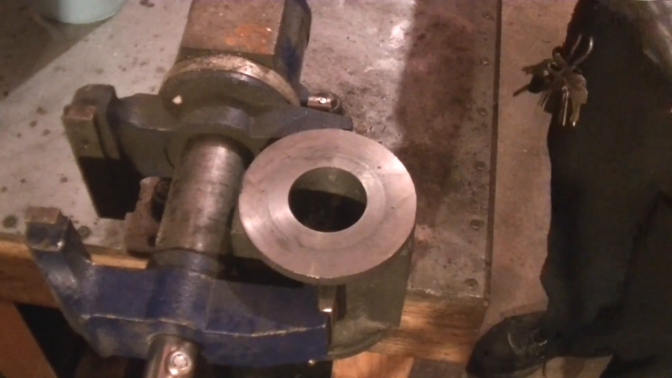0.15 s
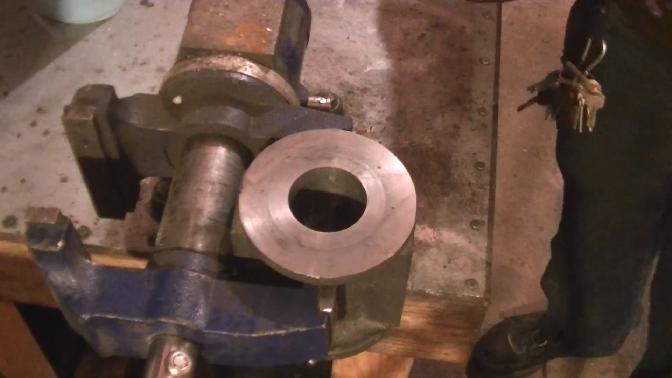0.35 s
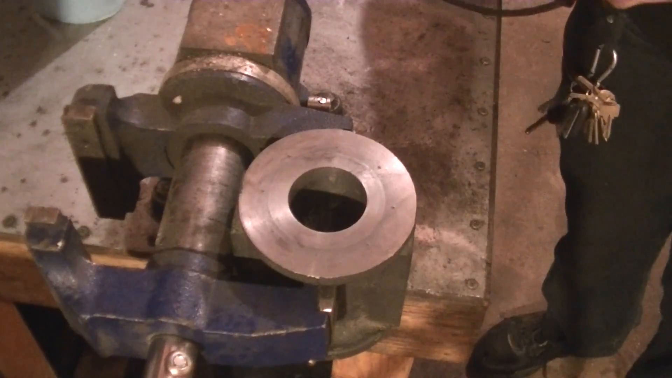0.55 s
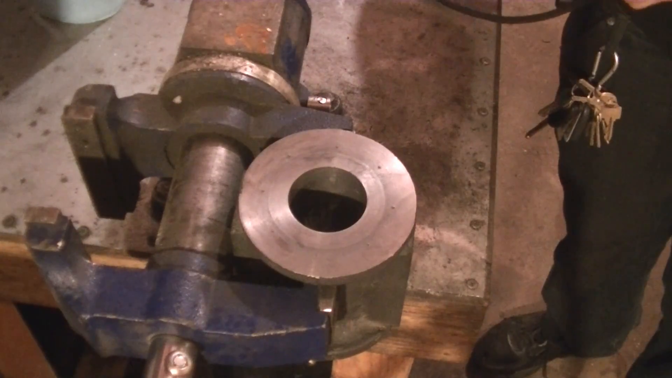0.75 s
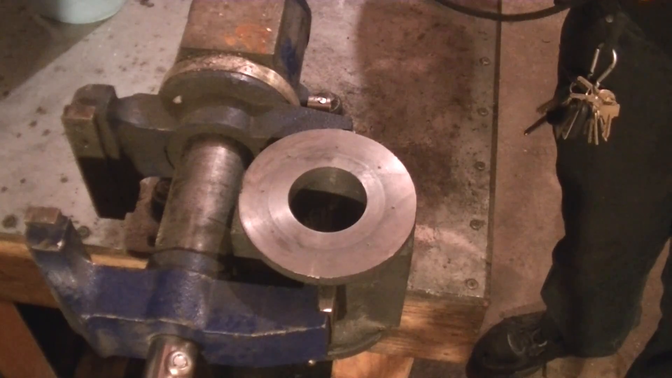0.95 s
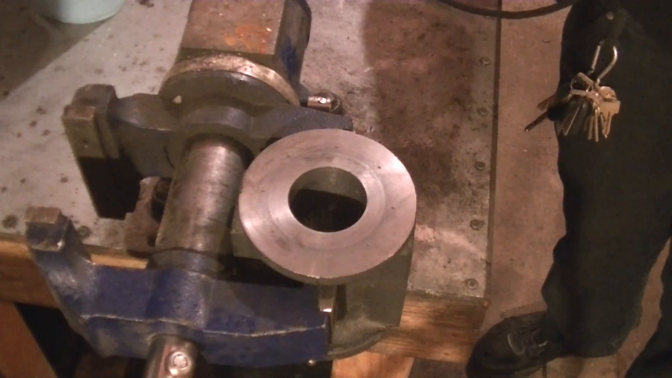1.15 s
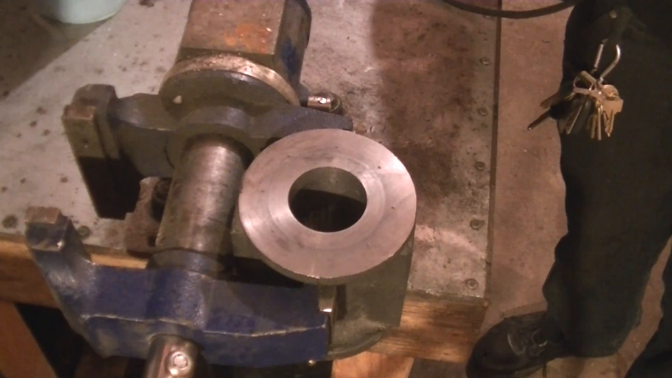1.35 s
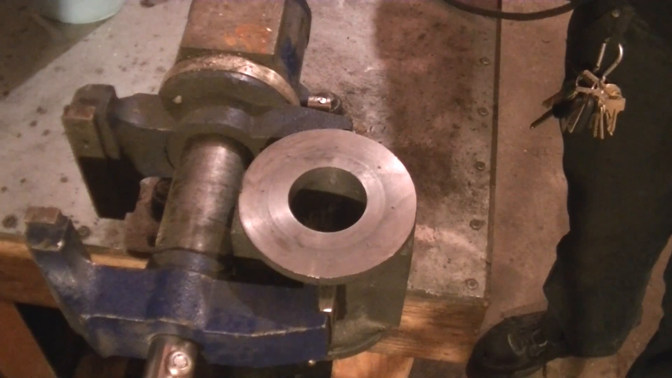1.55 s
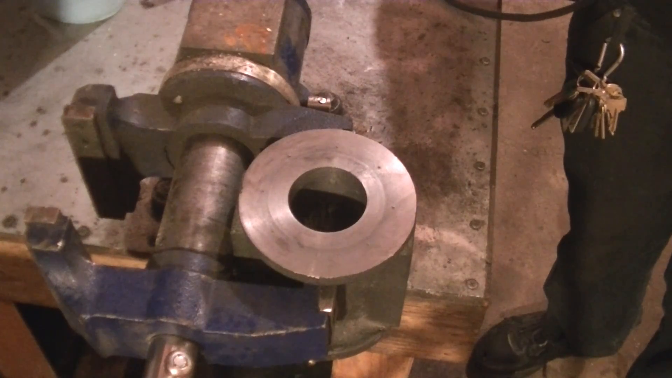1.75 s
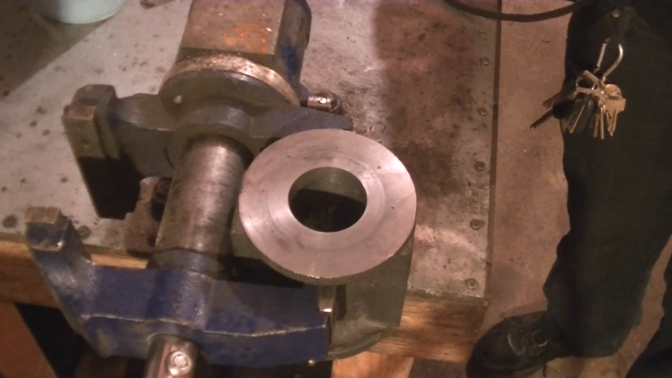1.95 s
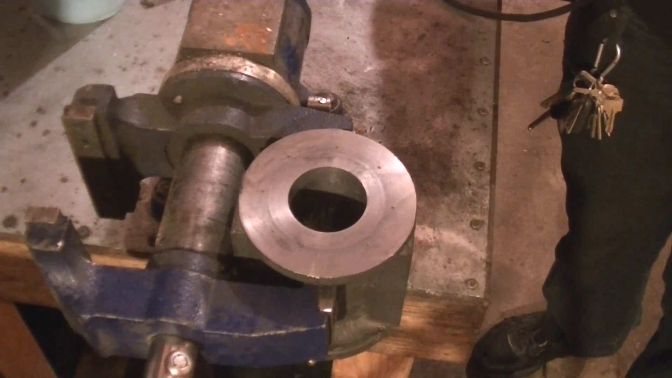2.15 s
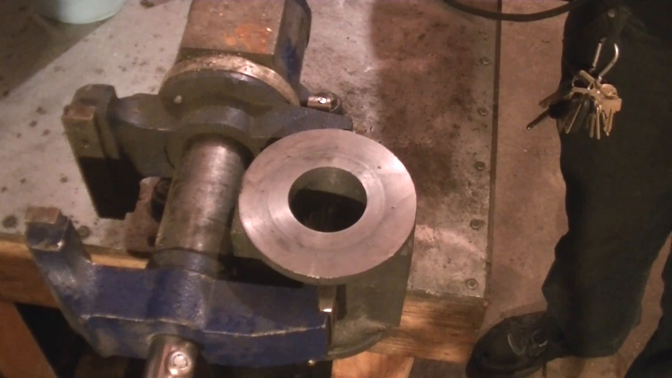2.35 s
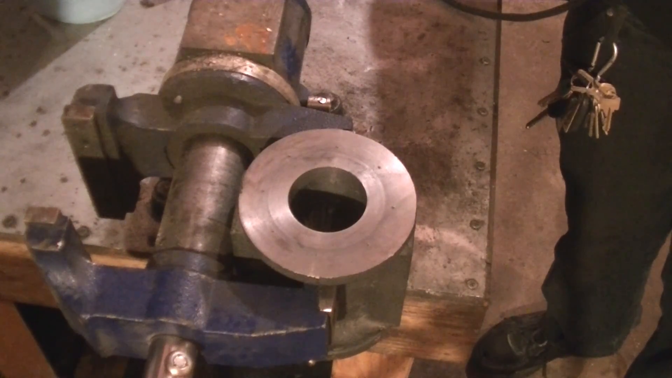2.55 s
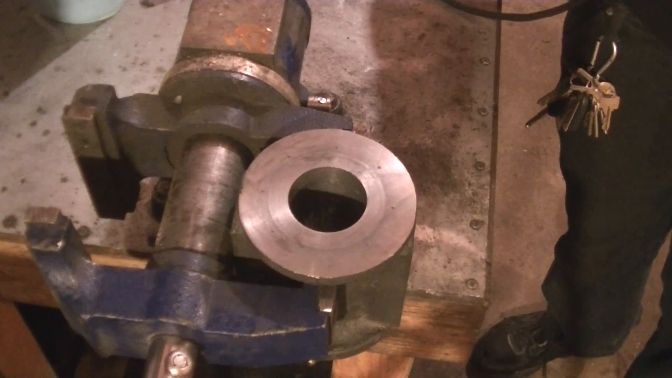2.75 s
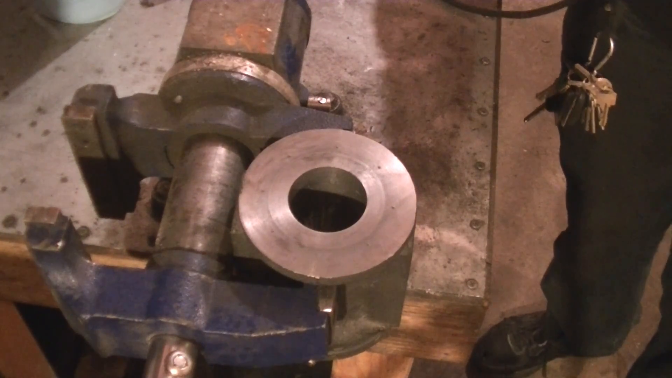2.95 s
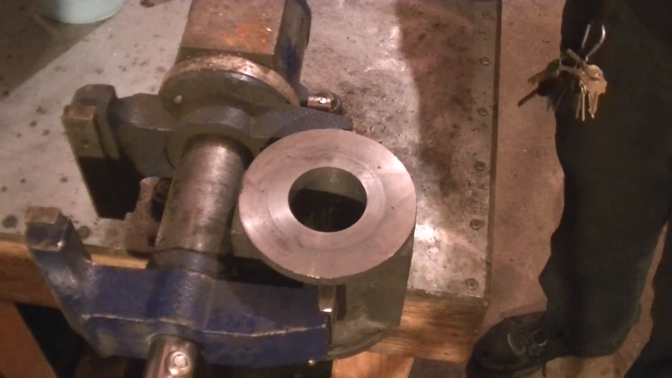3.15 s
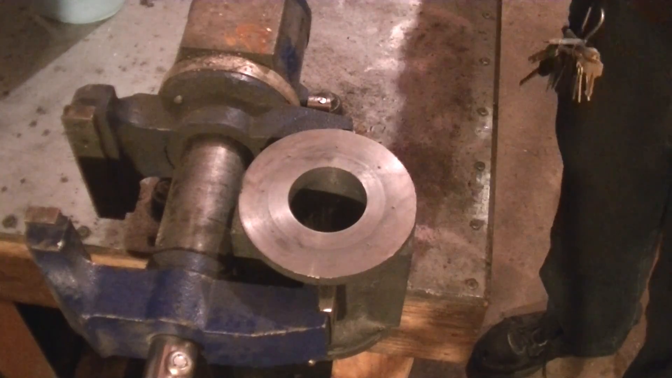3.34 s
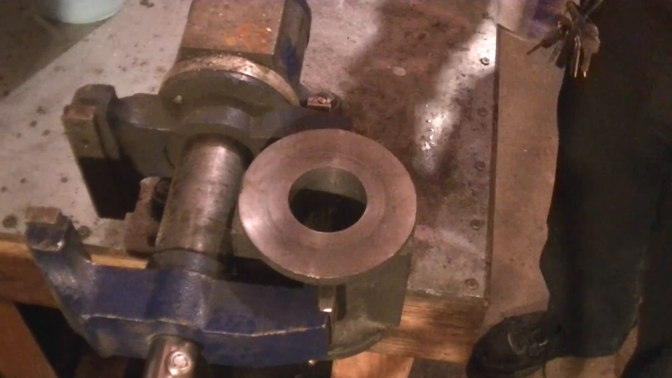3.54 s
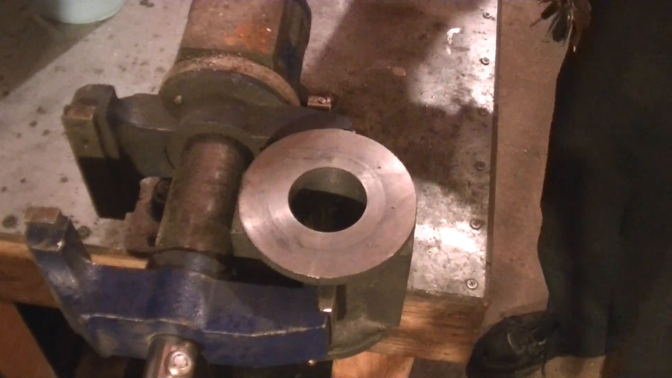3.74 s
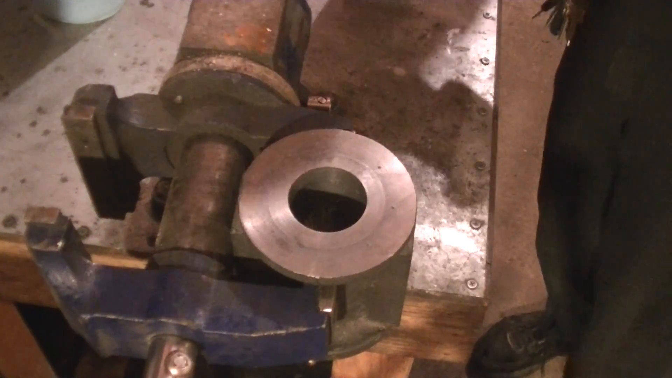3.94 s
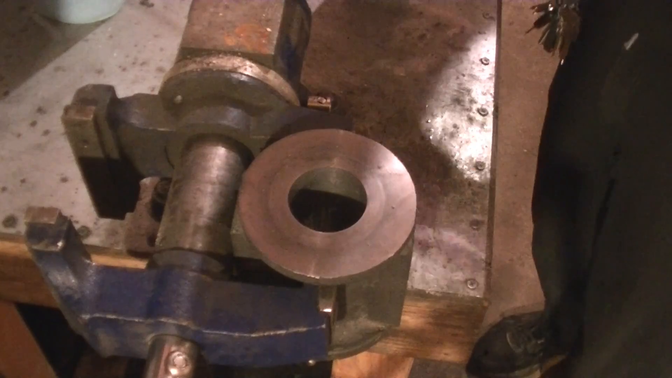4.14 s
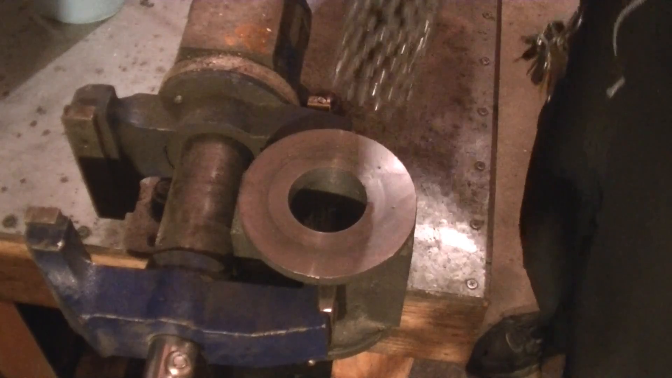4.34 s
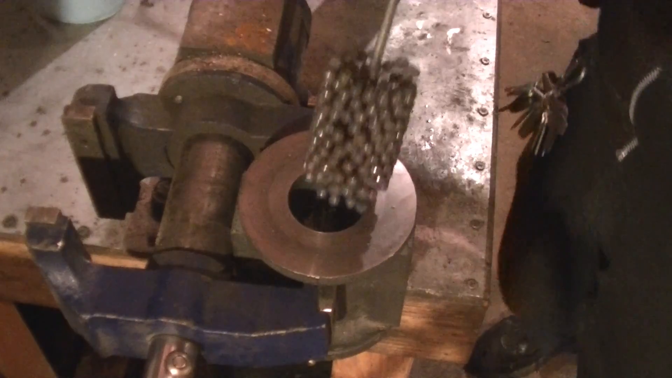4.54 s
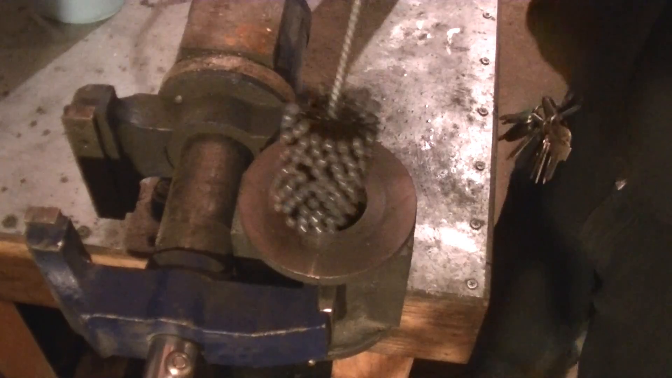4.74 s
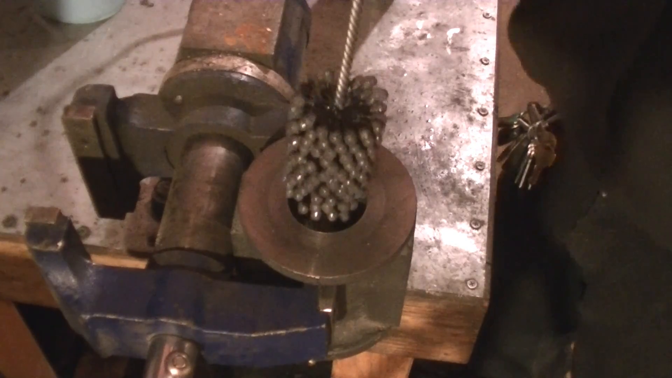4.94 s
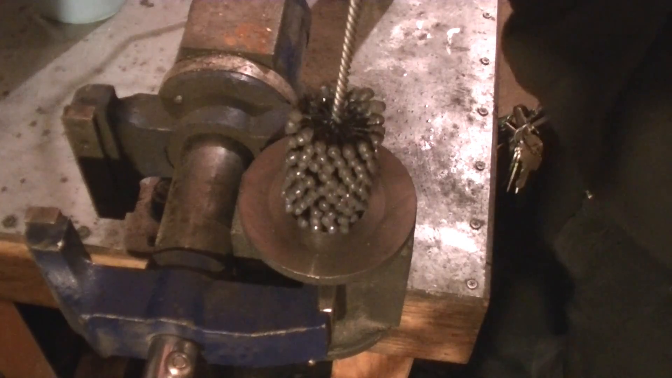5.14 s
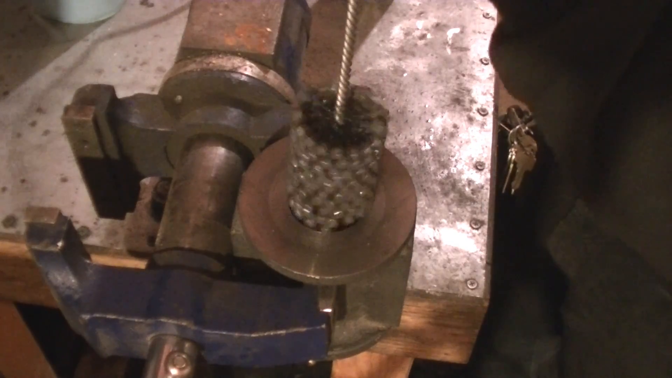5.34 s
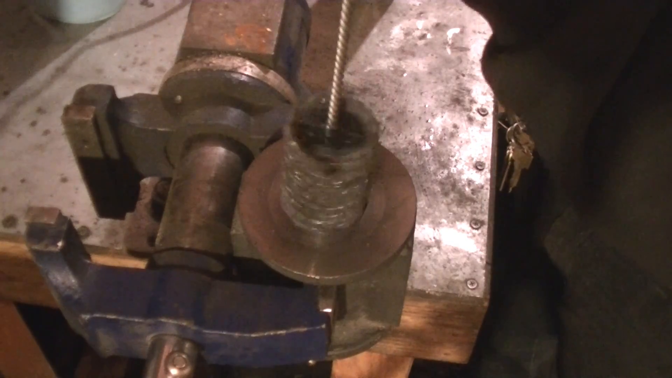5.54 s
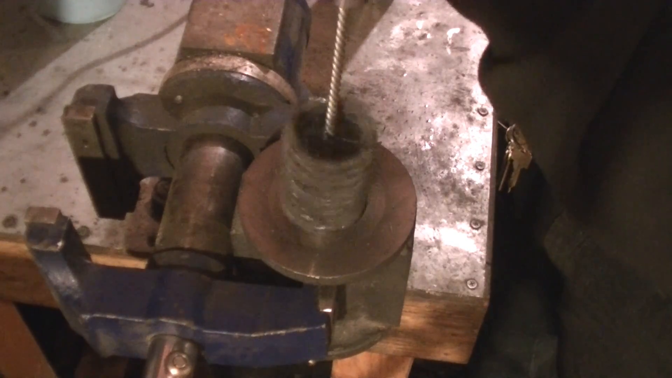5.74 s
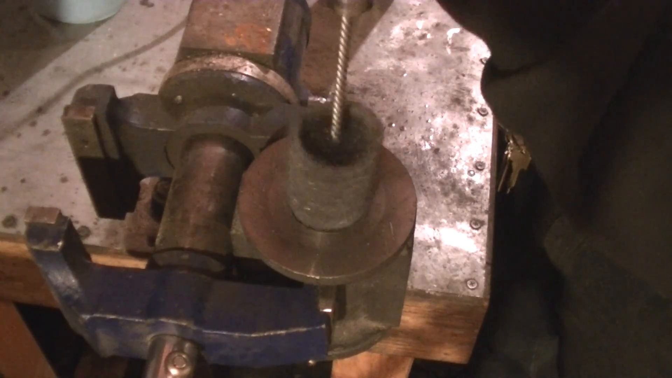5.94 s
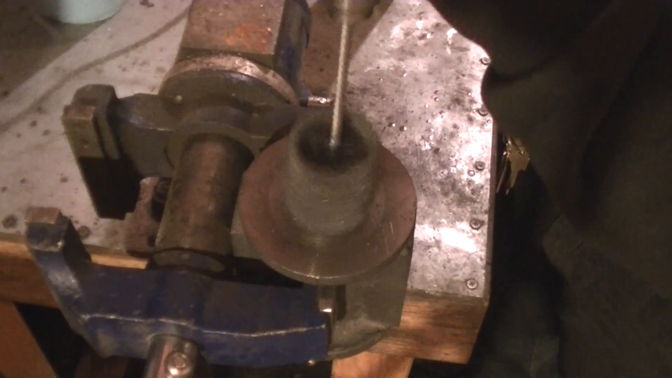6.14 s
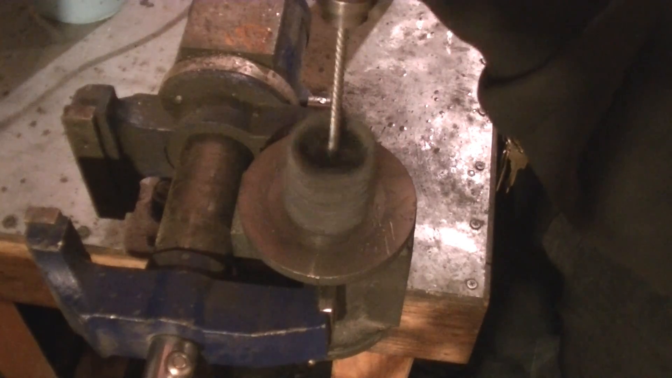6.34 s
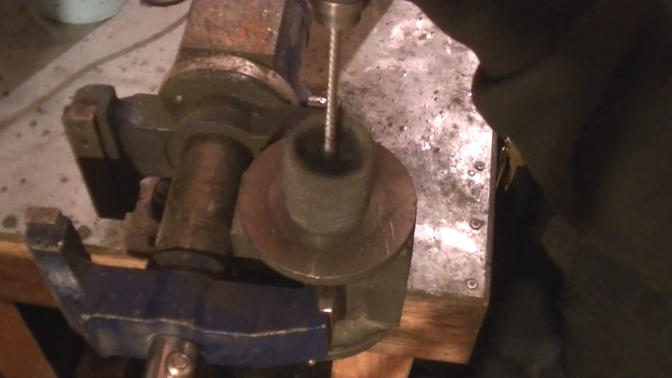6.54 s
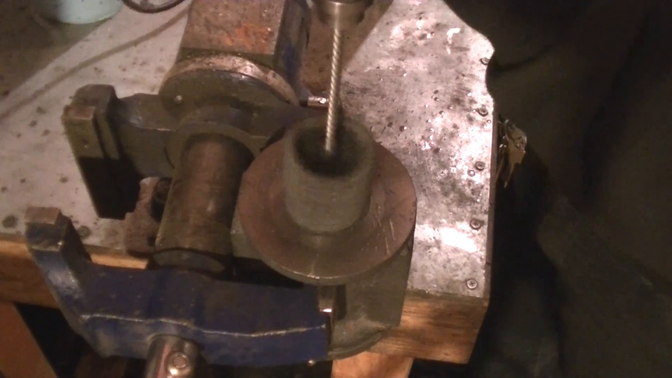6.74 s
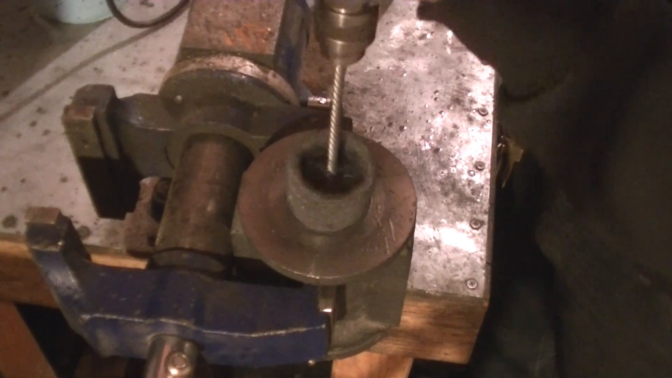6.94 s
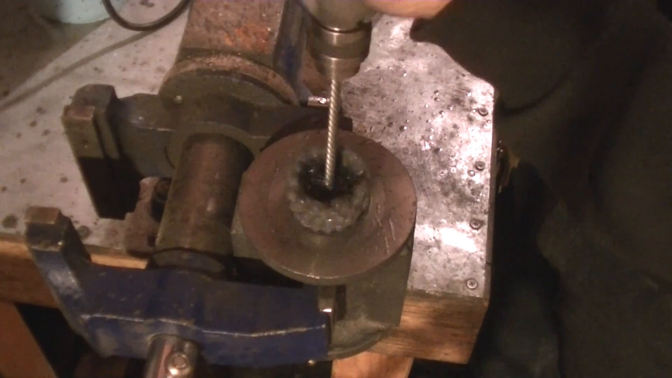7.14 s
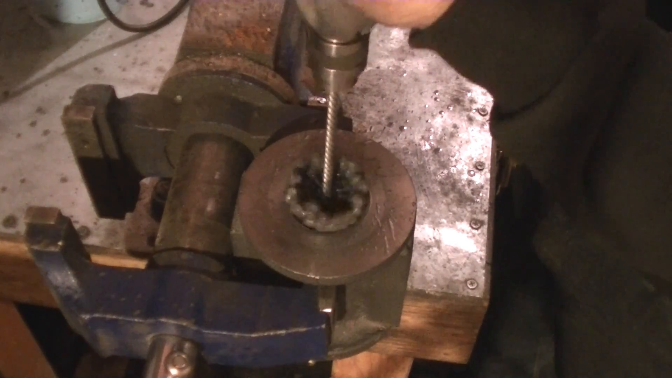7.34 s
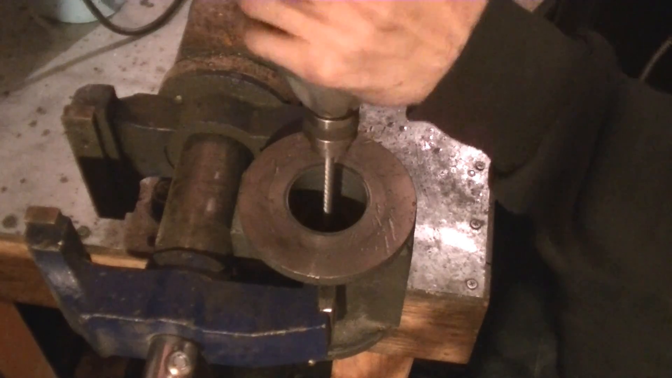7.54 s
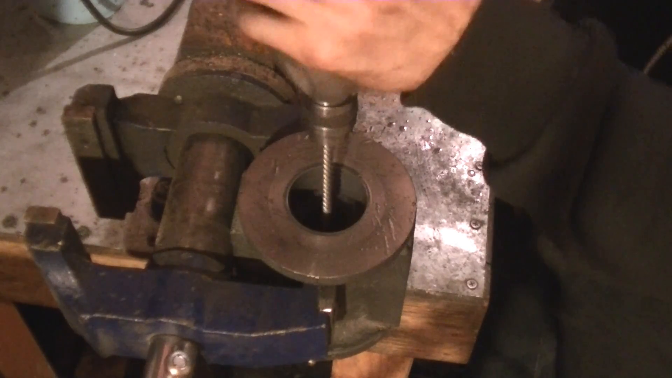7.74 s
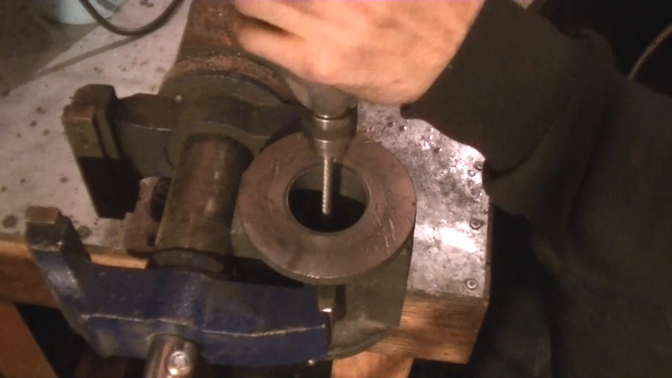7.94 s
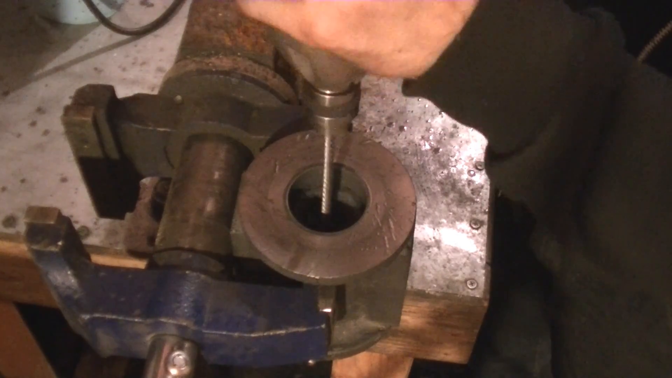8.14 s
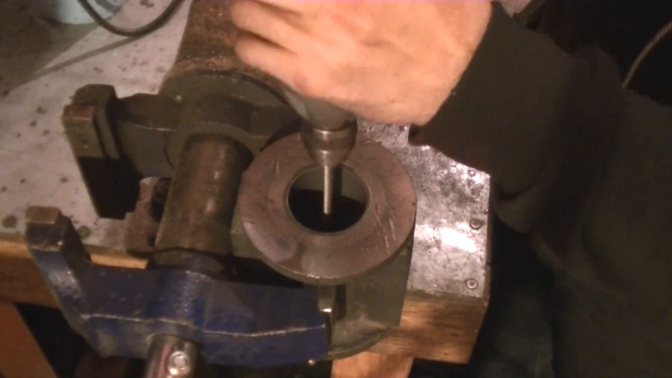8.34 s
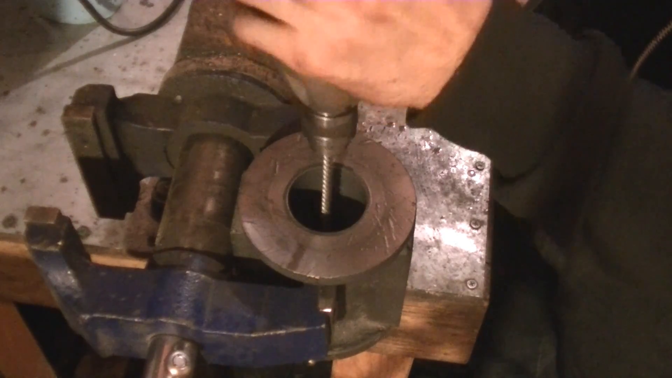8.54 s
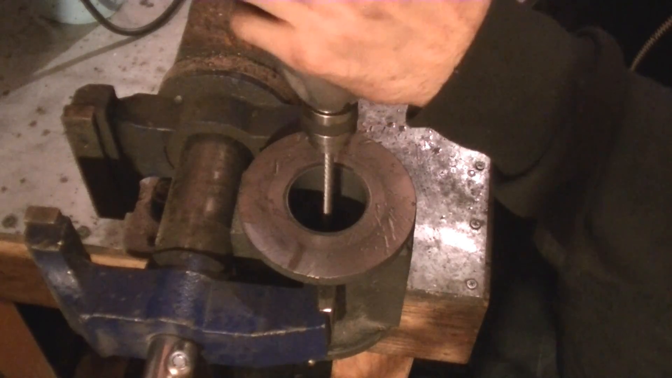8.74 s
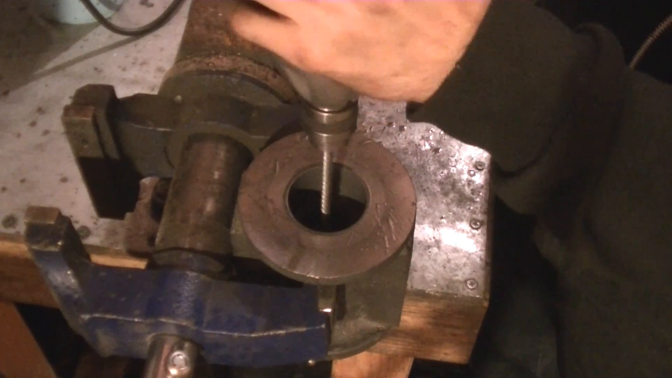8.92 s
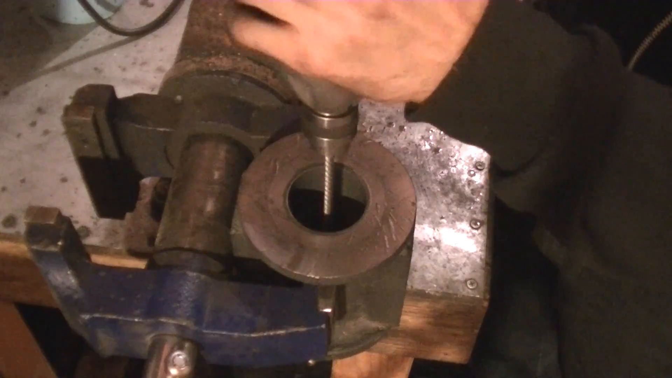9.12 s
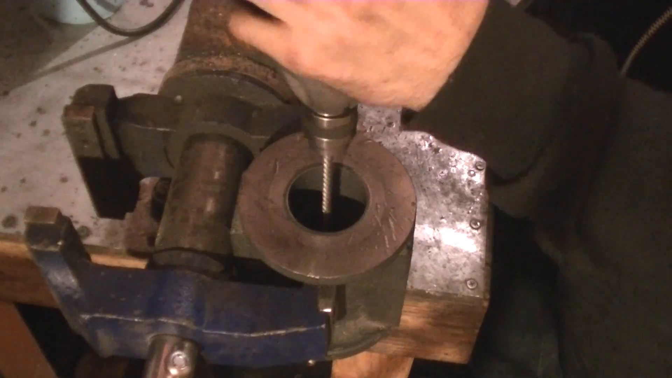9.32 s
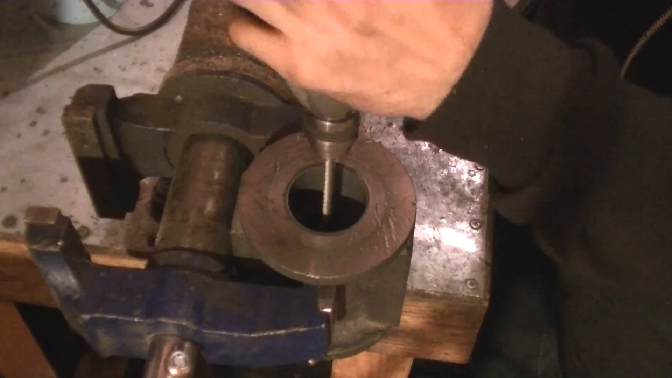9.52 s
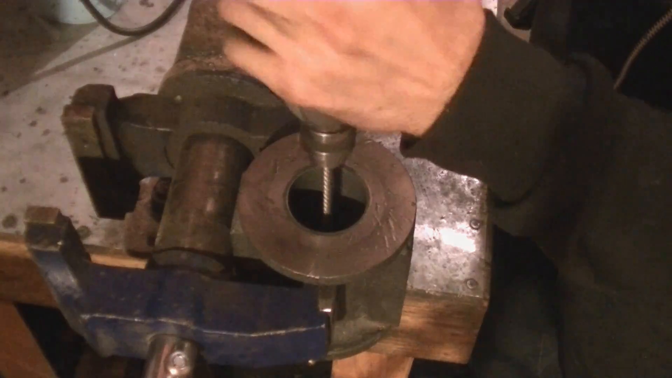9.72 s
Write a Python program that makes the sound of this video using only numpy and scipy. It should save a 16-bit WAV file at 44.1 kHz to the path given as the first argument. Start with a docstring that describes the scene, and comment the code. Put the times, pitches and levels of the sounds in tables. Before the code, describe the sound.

Buzzing drill ticks and spray hiss, a pause of cloth and metal clinks, then a rising whine, a sag, and steady gritty honing.

```python
"""Clothes rustle in a quiet shop, then oil spits and jets onto the ball hone of a corded drill.
The drill creeps on a barely pressed trigger: each mains cycle kicks its body, and loose gears rattle.
The can lands and rings the bench; metal clinks, cloth rustles and the hone is set on a steel cylinder held in a vise.
The drill winds up, sags as the beads are pushed into the bore, and whines on while they scrub the wall.
Whines are sines at multiples of rotor speed; scrubbing is coloured noise, in jerks at first, then even."""
import sys
import numpy as np
from scipy import signal
from scipy.fft import rfft, irfft
from scipy.io import wavfile
from scipy.ndimage import uniform_filter1d

SR = 44100
rng = np.random.default_rng(int(sys.argv[2]) if len(sys.argv) > 2 else 0)


def pcm_store(signal):
    """Save signal as 16-bit PCM."""
    levels = np.round(np.clip(np.atleast_2d(signal), -1, 1) * 32767)
    wavfile.write(sys.argv[1], SR, levels.astype(np.int16).T)


N = 431298
TIME = np.arange(N) / SR   # s
MAINS_HZ = 60
PINION_TEETH, WHEEL_TEETH, SEGMENTS = 7, 38, 12   # gear teeth, gear teeth, commutator segments


def from_db(db):
    """Decibels to gain."""
    return 10 ** (np.asarray(db) / 20)


def rms_one(x):
    """Scale to unit rms."""
    return x / np.sqrt(np.mean(x ** 2) + 1e-20)


def in_time(rows):
    """Each column of a curve, drawn in straight lines over the samples."""
    seconds, *columns = np.transpose(rows)
    return [np.interp(TIME, seconds, column) for column in columns]


def since(start, attack=.01):
    """Rises from nought to one and stays."""
    return np.clip((TIME - start) / max(attack, 1 / SR), 0, 1)


def swell(start, attack, hold, release):
    """Attack, hold and release between nought and one."""
    return since(start, attack) * (1 - since(start + attack + hold, release))


def swells(rows):
    """Gain of a run of soft-edged swells, each with its own level."""
    return sum(from_db(db) * swell(*shape) ** 2 for *shape, db in rows)


def drift(rate):
    """Slow random wander of unit rms."""
    knots = rng.standard_normal(4000)
    return rms_one(np.interp(TIME * rate * 2, np.arange(len(knots)), knots))


def colour(points, hz):
    """Gain of a spectrum at the given frequencies."""
    points = np.array(points)
    return from_db(np.interp(np.log(hz), np.log(points[:, 0]), points[:, 1]))


def response(points):
    """Causal impulse response of a body with this spectrum; it rings longest at steep edges."""
    hz = np.maximum(np.fft.rfftfreq(4096, 1 / SR), 1)
    cepstrum = irfft(np.log(colour(points, hz)))
    half = len(cepstrum) // 2
    # folding the cepstrum forward in time gives minimum phase
    folded = np.r_[cepstrum[0], 2 * cepstrum[1:half], np.zeros(half)]
    pulse = irfft(np.exp(rfft(folded)))[:half]
    return pulse / np.sqrt(np.sum(pulse ** 2))


def through(x, points):
    """Pass a force through a body, keeping the power of white noise."""
    return signal.oaconvolve(x, response(points))[:N]


def noise(points, grain_db=0):
    """Coloured noise made of contacts whose sizes spread by grain_db."""
    sizes = from_db(grain_db * rng.standard_normal(N))
    return rms_one(through(rng.standard_normal(N) * sizes, points))


def resonance(x, hz, width):
    """Two-pole band-pass with roughly unit gain on top."""
    r = np.exp(-np.pi * width / SR)
    feed = np.array([1, 0, -1]) * (1 - r * r) / 2
    back = [1, -2 * r * np.cos(2 * np.pi * hz / SR), r * r]
    return signal.lfilter(feed, back, x + 1e-18)


def ringing_noise(hz, width, second_hz, second_width):
    """White noise through two resonances in a row, at unit rms."""
    return rms_one(resonance(resonance(rng.standard_normal(N), hz, width), second_hz, second_width))


def ringing_modes(modes):
    """Sum of noise-driven resonances; rows of Hz, width in Hz, level in dB."""
    return sum(from_db(db) * ringing_noise(hz, width, hz, 2 * width) for hz, width, db in modes)


def fade(clicks, t60):
    """Every click starts an exponential decay, falling 60 dB in t60 seconds."""
    return signal.lfilter([1], [1, -from_db(-60 / (t60 * SR))], clicks + 1e-18)


def strikes(rows):
    """A click for each row of seconds and dB."""
    out = np.zeros(N)
    for s, db in rows:
        out[int(s * SR)] += from_db(db)
    return out


# Colour of the quiet shop. Each row: frequency in Hz, relative density in dB.
ROOM_COLOUR = [(15, -52), (25, -28), (48, -7.5), (70, -3), (92, -14.5), (134, -3), (157, -16.5),
               (185, -6.5), (344, -9.5), (5730, -23.5), (16000, -34)]
# Low hum of the shop. Each row: time in seconds, level in dB.
HUM_LEVEL = [(0, -72), (2.9, -58.5), (3.05, -70.5), (9.78, -64.5)]


def room_tone(floor_db=-56, hum_hz=71):
    """Steady coloured noise and one low sine whose level wanders."""
    hum = np.sqrt(2) * from_db(in_time(HUM_LEVEL)[0]) * np.sin(2 * np.pi * hum_hz * TIME)
    return hum + from_db(floor_db) * noise(ROOM_COLOUR)


# Cloth on cloth. Each row: start, attack, hold and release in seconds, level in dB.
CLOTH_RUSTLES = [(-.02, 0.016, .03, 0.32, -33), (.16, 0.071, .01, .05, -44), (3.56, 0.17, 0.18, .17, -35),
                 (4.01, 0.047, .18, .25, -47.5), (4.44, 0.079, .03, .05, -51),
                 (4.56, 0.066, 0.044, 0.14, -35.5), (4.75, 0.072, 0.13, 0.19, -33.5)]
# Tone of the cloth. Each row: frequency in Hz, relative density in dB.
CLOTH_COLOUR = [(150, -17), (320, -1), (480, -5), (700, -5), (1200, -3), (2000, -7.5), (3000, -13),
                (8500, -25.5), (16000, -38)]
# The drill shifts dully in the hands. Each row: start, attack, hold and release in seconds, level in dB.
GRIP_THUDS = [(-.02, .02, 0.13, .13, -45), (3.6, 0.063, .2, .1, -54), (3.95, 0.082, 0.35, 0.25, -47.5),
              (4.57, 0.055, 0.063, 0.12, -48), (4.79, 0.052, 0.14, 0.22, -38)]
# Tone of the thuds. Each row: frequency in Hz, relative density in dB.
GRIP_COLOUR = [(25, -37), (70, -9), (115, 5.5), (170, -9), (240, 6), (340, -0.5), (600, -8), (1500, -37.5)]


def handling(crumple_db=2.2):
    """Cloth slides in grainy, flickering noise, and the drill shifts in the hands as low dull noise."""
    crumple = from_db(crumple_db * drift(45))
    cloth = swells(CLOTH_RUSTLES) * crumple * noise(CLOTH_COLOUR, grain_db=7)
    return cloth + swells(GRIP_THUDS) * noise(GRIP_COLOUR)


# Soft bumps against the bench. Each row: time in seconds, relative level in dB.
BENCH_BUMPS = [(4.068, -32.5), (4.143, -43), (4.208, -32), (4.228, -44), (4.43, -46), (4.61, -36),
               (4.645, -37), (4.852, -28), (4.898, -29), (4.94, -28)]


def bumps(bump_t60=0.098):
    """Dull knocks as the drill and body shift against the bench: softened decays of low noise."""
    push = uniform_filter1d(fade(strikes(BENCH_BUMPS), bump_t60), size=300)
    return push * noise([(30, -19), (70, -10), (120, -3), (170, -9), (240, 7.0),
                         (350, -5), (600, -6), (1500, -30), (5000, -32)])


# The can lands on the bench. Each row: time in seconds, relative level in dB.
CAN_LANDINGS = [(3.8935, -4), (3.904, -17), (3.9285, -16)]
# Modes of can and bench. Each row: frequency in Hz, relative level in dB, 60 dB decay in seconds before a cap.
BENCH_MODES = [(118, -22, 1.2), (309, 2.5, 0.17), (515, -1.5, 0.2), (818, -23, 0.3), (1010, -28, 0.53),
               (1210, -22, 0.22), (1630, -13, 0.17), (1693, -2, 0.24), (1640, -16, 0.33), (2170, -32, 0.98),
               (2353, -23, 0.29), (2492, -16, 0.31), (2891, -24, 0.55), (3150, -11, 0.11),
               (3230, -22, 0.52), (3752, -28, 0.39)]
# Two faint clacks of the drill at 2.95 s, then small clinks of can, keys and beads. Each row: time in seconds,
# relative level in dB.
METAL_CLINKS = [(2.9545, -26), (2.9715, -34.5), (3.475, -32.5), (3.7354, -43), (3.8936, -11.5),
                (3.929, -19), (3.9515, -9.5), (3.991, -26), (4.133, -26.5), (4.2528, -27), (4.574, -32),
                (4.5965, -24.5), (4.7706, -28), (4.786, -34), (4.8324, -13.5), (4.9, -29), (4.9342, -18.5),
                (5.1273, -29), (5.2885, -12)]
# Tone of the clinks. Each row: frequency in Hz, relative density in dB.
METAL_COLOUR = [(200, -9), (900, 5), (2000, 2), (2700, -3.5), (3300, -2), (4200, -1.5), (6000, -4),
                (11000, -9.5), (16000, -23)]


def knocks(ring_db=-14, clatter_db=-9, clatter_t60=0.13, boom_db=-31.5, boom_t60=0.75,
           clink_db=-7, clink_t60=0.029, tail_db=-22, tail_t60=0.26):
    """The can rings the bench and shakes what lies on it; small metal things clink."""
    blows, clinks = strikes(CAN_LANDINGS), strikes(METAL_CLINKS)
    t = TIME[:SR // 2]
    bench = 0
    for hz, db, t60 in BENCH_MODES:
        decay = from_db(db - 60 * t / min(t60, .35))   # no mode rings longer than 0.35 s
        bench = bench + decay * np.sin(2 * np.pi * hz * t) * rng.choice([-1, 1])
    ring = from_db(ring_db) * signal.oaconvolve(blows, bench)[:N]
    clatter = from_db(clatter_db) * fade(blows, clatter_t60) * noise(
        [(30, -34), (110, 0), (280, 3.5), (700, -0.5), (1500, 4.5), (3000, -6.0), (8000, -27), (16000, -58)])
    boom = from_db(boom_db) * fade(blows, boom_t60) * noise(
        [(20, -4), (45, -6), (110, 9), (200, -21), (600, -53)])
    # each clink has a short tick and a quieter, longer tail
    clink_level = from_db(clink_db) * fade(clinks, clink_t60) + from_db(tail_db) * fade(clinks, tail_t60)
    return ring + clatter + boom + clink_level * noise(METAL_COLOUR)


# The nozzle spits. Each row: start, attack, hold and release in seconds, level in dB.
NOZZLE_SPITS = [(.22, 0.14, .015, 0.13, -24.5)]
# Tone of the spit. Each row: frequency in Hz, relative density in dB.
NOZZLE_SPIT_COLOUR = [(400, -18.5), (1300, -8), (2700, -2), (4200, -11.5), (7000, -20.5), (15000, -48)]
# Smooth jets of oil. Each row: start, attack, hold and release in seconds, level in dB.
OIL_JETS = [(.22, 0.12, .01, .1, -42), (.7, 0.627, 1.572, 0.12, -40.5)]
# Tone of the jets. Each row: frequency in Hz, relative density in dB.
OIL_JET_COLOUR = [(200, -14.5), (600, -5), (1300, -11.5), (3000, -8.5), (5500, -3), (8000, -2.5),
                  (11000, -11), (16000, -19.5)]


def spray():
    """The nozzle spits grainy noise, then settles to a smooth jet."""
    spit = swells(NOZZLE_SPITS) * noise(NOZZLE_SPIT_COLOUR, grain_db=-1.5)
    return swells(OIL_JETS) * noise(OIL_JET_COLOUR) + spit


# The hone touches the rim. Each row: start, attack, hold and release in seconds, level in dB.
RIM_TOUCHES = [(4.77, 0.022, .04, .05, -31.5)]


def bristles(ping_db=-30, ping_t60=0.013):
    """The springy beads of the hone brush over the rim, and the hone's shank pings once."""
    brush = noise([(500, -20), (1500, -8), (2400, 0), (3400, 0), (4500, -11), (9000, -17), (16000, -26)],
                  grain_db=5)
    tones = sum(np.sin(2 * np.pi * hz * TIME) * from_db(db) for hz, db in [(3050, 2), (3450, 0), (4950, 2)])
    ping = fade(strikes([(5.1273, ping_db)]), ping_t60) * tones
    return swells(RIM_TOUCHES) * brush + ping


# The stalled motor, trigger still held. Each row: frequency in Hz, relative level in dB.
STALL_LINES = [(301.5, -65), (360.7, -63.5), (419.9, -64), (479.1, -64.5), (538.3, -63.5)]
# How long it hums: start, attack, hold and release in seconds.
STALL_SPAN = (2.2, .05, 0.72, .04)


def stall(hum_db=-1):
    """The windings hum faintly with too little current to turn the rotor."""
    lines = sum(from_db(db + hum_db) * np.sin(2 * np.pi * (hz * TIME + rng.random())) for hz, db in STALL_LINES)
    return np.sqrt(2) * lines * swell(*STALL_SPAN)


# Gears and brushes rattle while the rotor creeps: start, attack, hold and release in seconds.
RATTLE_SPAN = (0.16, 0.027, 2.43, 0.12)
# Tone of the rattle. Each row: frequency in Hz, relative density in dB.
GEAR_COLOUR = [(59, -80), (100, -54), (315, -29), (535, -2), (608, -14), (784, -6.5), (970, -2),
               (1280, 1.5), (1480, -5), (1870, -2), (2860, -10), (4290, -17), (6290, -26.5), (9820, -25),
               (16000, -51.5)]
# Ringing of the gear case. Each row: frequency in Hz, width in Hz, relative level in dB.
GEAR_CASE = [(754, 68, 2.5), (3256, 184, -8), (4270, 290, -6.5), (5370, 580, -8)]
# Thin squeal of the motor brushes. Each row: start, attack, hold and release in seconds, level in dB.
BRUSH_SQUEAL = [(.55, .75, 1.03, .11, -49)]
# the rattle builds up, then dies as the rotor coasts
RATTLE_DB, RATTLE_BUILD_DB, RATTLE_BUILD_S = -29, 16, 0.58
COAST_FROM_S, COAST_DB_PER_S = 2.157, 29


def idling(case_db=-4.5, flutter_db=2.0, squeal_hz=10200, squeal_width=160):
    """Loose gears rattle in their ringing case and coast down; the brushes squeal faintly."""
    still_to_build = RATTLE_BUILD_DB * np.exp((RATTLE_SPAN[0] - TIME) / RATTLE_BUILD_S)
    coasting = COAST_DB_PER_S * np.maximum(TIME - COAST_FROM_S, 0)
    level = RATTLE_DB - still_to_build - coasting + flutter_db * drift(70)
    gears = noise(GEAR_COLOUR, grain_db=4.5) + from_db(case_db) * ringing_modes(GEAR_CASE)
    squeal = ringing_noise(squeal_hz, squeal_width, squeal_hz, squeal_width)
    return gears * from_db(level) * swell(*RATTLE_SPAN) + squeal * swells(BRUSH_SQUEAL)


# Trains of motor kicks. Each row: first kick in seconds, end in seconds, relative level in dB.
KICK_TRAINS = [(0.2413, .25, -12), (.2762, .28, -21.5), (0.3097, .6, -21.5), (0.608, 2.22, -14),
               (2.726, 2.95, -69), (2.954, 2.98, -41), (5.257, 5.28, -27.5), (5.2886, 9.78, -22)]


def firings(jitter_s=.00009):
    """The speed control fires once per mains cycle, a little unevenly."""
    rows = []
    for first, end, db in KICK_TRAINS:
        for s in np.arange(first, end, 1 / MAINS_HZ):
            rows.append((s + jitter_s * rng.standard_normal(), db))
    return strikes(rows)


def bench_shake():
    """The running drill shakes the bench faintly, as low noise."""
    creeping = since(KICK_TRAINS[2][0]) - since(COAST_FROM_S)
    level = from_db(-55) * since(HONE_START_S) + from_db(-53.0) * creeping
    return level * noise([(25, -1.5), (55, -7), (130, -1), (300, -1.5), (900, -38.0)])


# Hardest kicks, with a loud clack of the gears. Each row: time in seconds, relative level in dB.
HARDEST_KICKS = [(0.656, -14.5), (0.7236, -8.5), (0.8066, -15), (1.1233, -12), (1.2565, -6), (1.273, -7.5),
                 (1.6552, -8.5), (1.8067, -9), (1.9061, -9), (2.0732, -6.5)]
# The drill body answering a kick: creeping free, under load, lightly touched.
# Each row: frequency in Hz, relative level in dB.
FREE_BODY = [(100, -43.5), (400, -36), (550, -25.5), (660, -31.5), (725, -9.5), (785, -0.5), (890, 2.5),
             (1050, -6), (1330, -11), (1520, -27), (2200, -31.5), (5000, -51.5), (16000, -96)]
LOADED_BODY = [(100, -45), (350, -30.5), (490, -9.5), (610, -20.5), (720, -1), (810, 4.5), (980, -16.5),
               (1400, -6), (1900, -21.5), (3000, -26), (5000, -32), (16000, -84)]
GENTLE_BODY = [(100, -49), (400, -32), (560, -16), (670, -25), (730, -4.5), (810, 0.5), (950, -4),
               (1150, -17.5), (1400, -26.5), (2300, -25.5), (5000, -62.5), (16000, -70)]
# Creeping rotor. Each row: time in seconds, commutator segments passing per second.
CREEP_RATE = [(.6, 17.6), (.83, 25), (.97, 16), (1.36, 11), (1.7, 19.5), (1.9, 20), (2.0, 26), (2.2, 17.3)]
# The trigger is briefly squeezed a little further: start, attack, hold and release in seconds.
TRIGGER_SQUEEZE = (.38, .1, 0.013, 0.033)
SQUEEZE_DB = 5
# once the rotor picks up, the kicks smooth out
SMOOTH_FROM_S, SMOOTH_DB_PER_S, SMOOTH_MOST_DB = 5.76, 21.5, 17


def kicks(fired, throb_db=1.35, clack_db=-8.0, clack_throb_db=1.5, hard_db=-9, clack_t60=0.022):
    """Each firing jolts the drill body, hardest when the commutator lines up; gear teeth clack across their play."""
    creep_start = KICK_TRAINS[3][0]
    segments = np.cumsum(in_time(CREEP_RATE)[0] * (TIME > creep_start)) / SR
    throb = (TIME > creep_start - 1 / MAINS_HZ / 2) * np.cos(2 * np.pi * segments)
    squeeze = SQUEEZE_DB * swell(*TRIGGER_SQUEEZE)
    free = fired * (TIME < 4) * from_db(squeeze + throb_db * throb + .5 * rng.standard_normal(N))
    smoothing = np.clip(SMOOTH_DB_PER_S * (TIME - SMOOTH_FROM_S), 0, SMOOTH_MOST_DB)
    loaded = fired * (TIME > 4) * from_db(1.3 * rng.standard_normal(N) - smoothing)
    # the lightest touch of the trigger gives duller kicks
    gentle_early = (TIME > KICK_TRAINS[0][1]) & (TIME < KICK_TRAINS[2][1])
    gentle_late = (TIME > KICK_TRAINS[-3][1]) & (TIME < HONE_START_S)
    gentle = gentle_early | gentle_late
    jolts = through(free * ~gentle, FREE_BODY)
    jolts += through((free + loaded) * gentle, GENTLE_BODY)
    jolts += through(loaded * ~gentle, LOADED_BODY)
    hits = free * from_db(clack_db + clack_throb_db * throb) + strikes(HARDEST_KICKS) * from_db(hard_db)
    clack = noise([(200, -21.0), (800, 2.5), (1900, 5), (2800, -3.0), (4300, 2.5), (5600, 0.0),
                   (7500, -14.5), (15000, -34)], grain_db=4.0)
    return jolts * np.sqrt(SR / MAINS_HZ) + fade(hits, clack_t60) * clack


# The beads skim the edge of the rim. Each row: start, attack, hold and release in seconds, level in dB.
RIM_SIZZLE = [(5.6, 0.38, .17, .9, -29.5)]


def sizzle(sizzle_hz=11400, sizzle_width=2400):
    """A bright hiss as the spinning beads skim the edge of the bore."""
    return swells(RIM_SIZZLE) * ringing_noise(sizzle_hz, sizzle_width, sizzle_hz, sizzle_width)


# Scrubbing colours on the rim and in the bore. Each row: frequency in Hz, relative density in dB.
RIM_COLOUR = [(59, -79), (100, -40), (249, -33), (302, -24.5), (358, -26.5), (570, -18.5), (691, -6.5),
              (1200, -9), (2130, -11), (2630, -11), (3120, 1.5), (5190, 0.5), (5900, -12.5), (11900, -17),
              (16000, -28)]
BORE_COLOUR = [(59, -75), (100, -44.5), (249, -19), (452, -17), (736, -5.5), (1130, -11), (1450, -8),
               (1760, -5.5), (2420, -11.5), (3620, -1.5), (4570, -7), (5300, -10.5), (7610, -20),
               (12900, -25.5), (16000, -32.5)]
# Resonances of the bore and gear case. Each row: frequency in Hz, width in Hz, relative level in dB.
BORE_RESONANCES = [(920, 243, -7), (1810, 370, -12), (3400, 1080, -6), (5210, 470, -11)]
# Body, scrape and grit of the scrubbing. Each row: dB on the rim, dB in the bore, dB lost at a standstill,
# dB added under strain, dB added at entry, flutter in dB.
SCRUB_BANDS = [(-15, -21, 12, -2, 0.5, .5), (-14, -16, 13, -2, 4, .5), (-26, -24.5, 18.5, -2.5, 8, 1.6)]
# Hardest raps of the beads as the hone starts. Each row: time in seconds, extra push in dB against an ordinary jerk.
BEAD_RAPS = [(5.2885, -8), (5.3215, 2), (5.3385, -3), (5.3885, 1), (5.4385, -1), (5.472, -6), (5.5545, -6),
             (5.672, -3), (5.755, -8)]
# The beads squeeze through the mouth of the bore: start, attack, hold and release in seconds.
BORE_ENTRY = (6.93, 0.12, 0.039, 0.031)
# the beads start to drag, and bite fully from this rotor speed on
HONE_START_S, BITE_SPEED = 5.28, 196   # s, turns per s
# the scrubbing comes in jerks that even out towards this rotor speed
EVEN_SPEED, JERK_FALLOFF, JERK_LEAST = 356, 1.8, .04   # turns per s, exponent, share


def scrubbing(fired, speed, turns, depth, strain, jerk_t60=0.026, jerk_spread_db=2.0, sway=0.11, ripple=0.13):
    """Abrasive beads drag over steel, louder with speed: in jerks, then an even rush coloured by the bore."""
    bore = rms_one(noise(BORE_COLOUR, grain_db=2.5) + ringing_modes(BORE_RESONANCES))
    rim = rms_one(noise(RIM_COLOUR, grain_db=5) + from_db(-15.5) * ringing_noise(5070, 600, 5850, 1000))
    honing, entry = since(HONE_START_S), swell(*BORE_ENTRY)
    slowness = np.maximum(1 - speed / BITE_SPEED, 0)
    out = 0
    bands = [(20, 2350), (2350, 6700), (6700, 20000)]   # Hz
    for (rim_db, bore_db, slow_db, strain_db, entry_db, flutter_db), band in zip(SCRUB_BANDS, bands):
        sos = signal.butter(3, band, "band", fs=SR, output="sos")
        on_rim, in_bore = (rms_one(signal.sosfilt(sos, x)) for x in (rim, bore))
        level = rim_db + (bore_db - rim_db) * depth - slow_db * slowness
        level = level + strain_db * strain + entry_db * entry
        level = level + flutter_db * (drift(8) + drift(40)) / np.sqrt(2)
        out = out + from_db(level) * (np.sqrt(1 - depth) * on_rim + np.sqrt(depth) * in_bore)
    slow_share = np.maximum(1 - speed / EVEN_SPEED, 0) ** JERK_FALLOFF
    jerky = np.clip(JERK_LEAST + (1 - depth) * slow_share, 0, 1)
    pushes = (fired > 0) * honing * from_db(jerk_spread_db * rng.standard_normal(N)) + strikes(BEAD_RAPS)
    jerks = uniform_filter1d(fade(pushes, jerk_t60), size=56)
    jerks = jerks ** 2 / np.mean(jerks[honing > .5] ** 2)
    # pressure swings with each turn of the gear wheel and each half cycle of the mains
    wheel_sway = sway * depth * np.cos(2 * np.pi * turns * PINION_TEETH / WHEEL_TEETH)
    pressure = 1 + wheel_sway + ripple * np.cos(4 * np.pi * MAINS_HZ * TIME)
    return out * np.sqrt(1 - jerky + jerky * jerks) * pressure * honing


# Main whines of gear mesh, its octave and the commutator: dB running free, dB under load,
# dB added under strain, dB lost per octave below the singing speed.
MESH_LEVELS = (-25, -26.3, 9, 19)
OCTAVE_LEVELS = (-40, -26.5, 8, 24)
COMMUTATOR_LEVELS = (-27.5, -26, -4, 28)
# Lesser whines of gears and fan. Each row: multiple of rotor speed, relative dB on the rim, relative dB in the bore.
LESSER_WHINES = [(1.002, -41, -46.5), (2.02, -55, -38.5), (2.24, -38, -54), (4.387, -27, -22),
                 (5.54, -29, -46), (6.66, -30, -33), (7.99, -35, -31), (8.87, -49, -35), (10.83, -49, -47),
                 (20.57, -37.5, -38), (24.36, -47, -37)]
# A whine swells as it glides through a housing resonance. Each row: frequency in Hz, width in Hz, dB added.
HOUSING_MODES = [(1785, 64, 3.5), (3705, 105, 2.5)]
SINGING_SPEED = 232   # rotor turns per s


def whine(speed, turns, depth, strain, waver_db=2.55, rasp_db=3.0, wobble=0.59, smear=1.06, catch=.9,
          lesser_db=-1.5, lesser_strain_db=-5):
    """Teeth and commutator sing at multiples of rotor speed; the off-centre wheel swings the mesh loudness."""
    wheel = 2 * np.pi * turns * PINION_TEETH / WHEEL_TEETH
    play = (speed / speed.max()) ** 2   # fast teeth bounce in their play, slow loaded ones run clean
    unrest = play + catch * swell(*BORE_ENTRY)   # beads snag at the mouth of the bore
    octaves_slow = np.maximum(np.log2(SINGING_SPEED / speed), 0)
    load = np.maximum(depth, strain)

    def main_level(free, loaded, strained, slow):
        """Level in dB of a main whine."""
        return free + (loaded - free) * load + strained * strain - slow * octaves_slow

    def line(order, db, swing=0):
        """One wavering partial; swing shifts its phase in radians."""
        flicker = unrest * (waver_db * drift(22) + rasp_db * (drift(130) - .3))
        lift = sum(peak / (1 + (2 * (order * speed - hz) / width) ** 2) for hz, width, peak in HOUSING_MODES)
        return np.sqrt(2) * from_db(db + flicker + lift) * np.sin(2 * np.pi * order * turns + swing)

    mesh = line(PINION_TEETH, main_level(*MESH_LEVELS), 0.39 * play * drift(70))
    octave_swing = 0.82 * np.sin(wheel) + smear * unrest * drift(90)
    octave = line(2 * PINION_TEETH, main_level(*OCTAVE_LEVELS), octave_swing)
    out = mesh * (1 + 0.23 * np.cos(wheel)) + octave * (1 + wobble * np.cos(wheel))
    out += line(SEGMENTS, main_level(*COMMUTATOR_LEVELS))
    lesser = sum(line(order, rim + (bore - rim) * depth, 0.28 * drift(45)) for order, rim, bore in LESSER_WHINES)
    out += from_db(lesser_db + lesser_strain_db * strain) * lesser * play
    return out * since(ROTOR_SPEED[0][0])


# The drill winds up, sags at the plunge and recovers. Each row: time in seconds, rotor turns per second.
ROTOR_SPEED = [(5.25, 19.6), (5.9, 176), (6.0, 217), (6.07, 256), (6.22, 302), (6.43, 314), (6.78, 314),
               (6.89, 290), (7.02, 160), (7.12, 199.5), (7.27, 222.5), (7.74, 243), (8.03, 246.7),
               (8.2, 244.4), (8.38, 253.5), (8.85, 257.5), (9.12, 258.5), (9.78, 263.5)]
# How far the hone is in the bore. Each row: time in seconds, share from 0 to 1.
HONE_DEPTH = [(6.85, 0.02), (7.15, 1)]
# The motor strains as the hone is pushed down: start, attack, hold and release in seconds.
MOTOR_STRAIN = (6.84, 0.13, 0.36, 0.36)


def drill(fired):
    """Kicks and rattle of the drill, with whine and scrubbing that share one rotor, one depth and one strain."""
    depth, strain = in_time(HONE_DEPTH)[0], swell(*MOTOR_STRAIN)
    speed = in_time(ROTOR_SPEED)[0]
    turns = np.cumsum(speed * (1 + .001 * drift(14))) / SR
    honing = scrubbing(fired, speed, turns, depth, strain) + sizzle()
    return kicks(fired) + idling() + whine(speed, turns, depth, strain) + honing


def workshop(x, wet_db=-17, t60=0.19, bench_echo_db=-19, bench_echo_s=.0092):
    """One near reflection and a short diffuse tail."""
    t = TIME[:SR // 3]
    tail = rng.standard_normal(len(t)) * from_db(-60 * t / t60) * (t > .004)
    echoes = from_db(wet_db) * tail / np.sqrt(np.sum(tail ** 2))
    echoes[int(bench_echo_s * SR)] += from_db(bench_echo_db)
    return x + signal.oaconvolve(x, echoes)[:N]


# Side against mid. Each row: frequency in Hz, level in dB.
SIDE_WIDTH = [(40, -11.5), (250, -12.5), (900, -21.5), (2200, -24.5), (4500, -19), (8000, -9.5),
              (15000, -6)]


def stereo(mid, left_db=0.31):
    """Close microphones: only sideways reflections differ, most in the treble."""
    t = TIME[:8192]
    scatter = rfft(rng.standard_normal(len(t)) * from_db(-60 * t / .2))
    hz = np.maximum(np.fft.rfftfreq(len(t), 1 / SR), 1)
    scatter *= colour(SIDE_WIDTH, hz) / np.sqrt(np.mean(abs(scatter) ** 2))
    side = signal.oaconvolve(mid, irfft(scatter)[:len(t) // 2])[:N]
    return np.array([(mid + side) * from_db(left_db), (mid - side) * from_db(-left_db)])


def scene():
    """Drill, spray and handling in the shop, over its quiet hum."""
    bench = handling() + bumps() + knocks() + spray() + bristles()
    echoing = workshop(bench + drill(firings()))
    return stereo(room_tone() + bench_shake() + stall() + echoing)


def record(dry):
    """Peaks are rounded and the top is cut."""
    rounded = dry / (1 + dry ** 4) ** .25
    top_cut = signal.ellip(10, .1, 80, 16000, fs=SR, output="sos")   # cutoff in Hz
    return signal.sosfilt(top_cut, rounded)


dry = scene()
out = record(dry)
pcm_store(out)
```